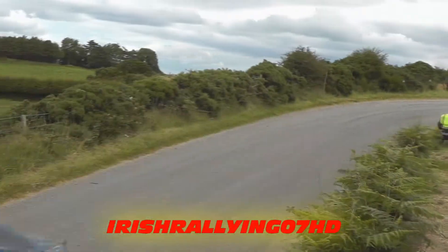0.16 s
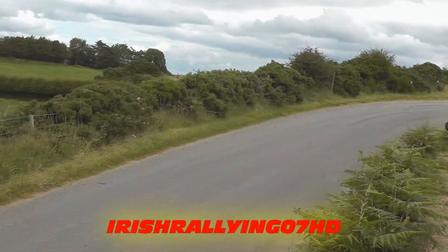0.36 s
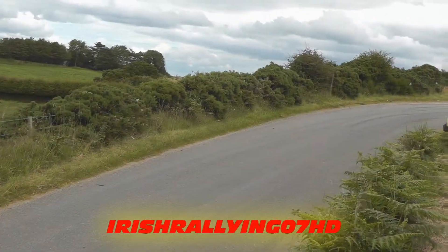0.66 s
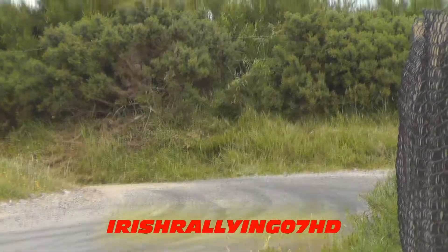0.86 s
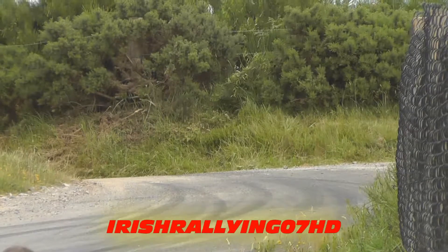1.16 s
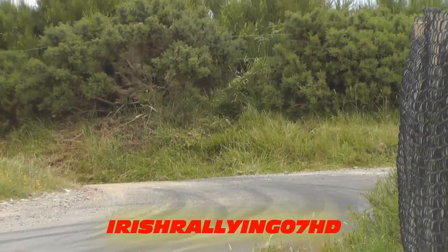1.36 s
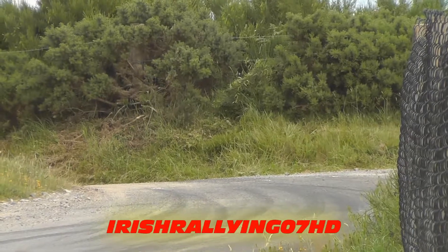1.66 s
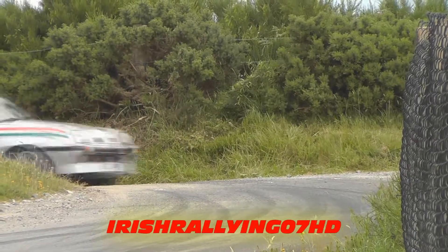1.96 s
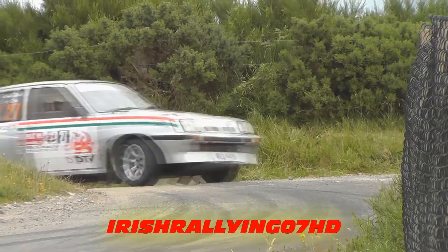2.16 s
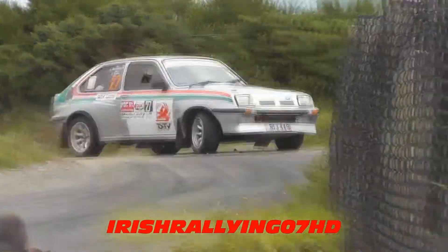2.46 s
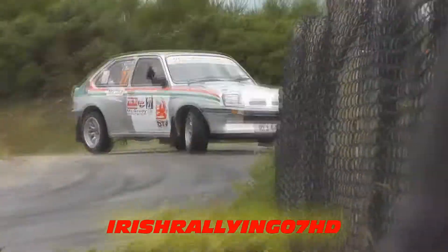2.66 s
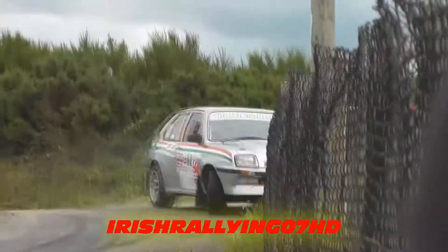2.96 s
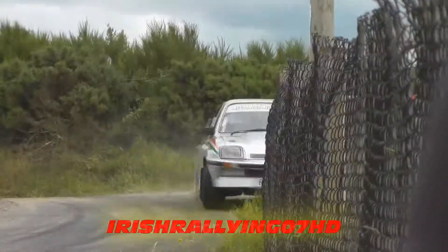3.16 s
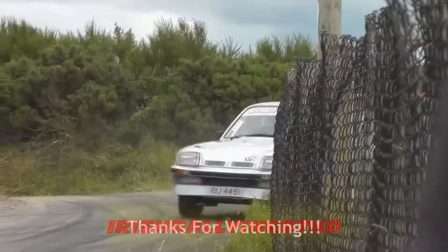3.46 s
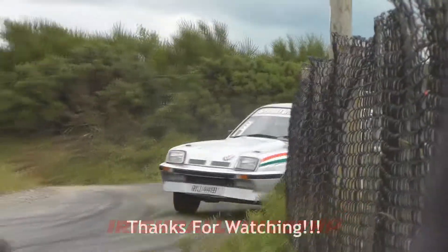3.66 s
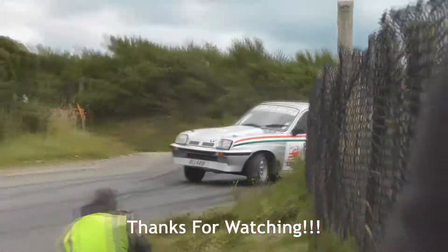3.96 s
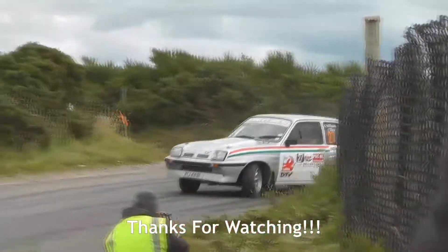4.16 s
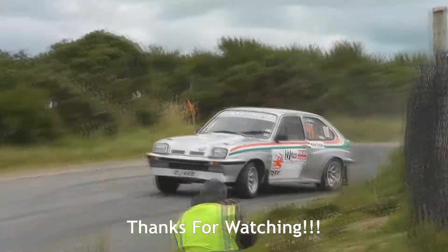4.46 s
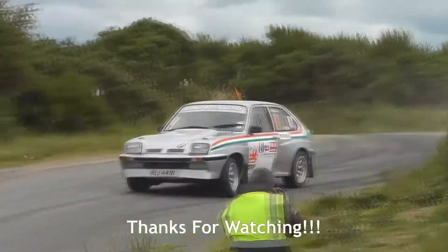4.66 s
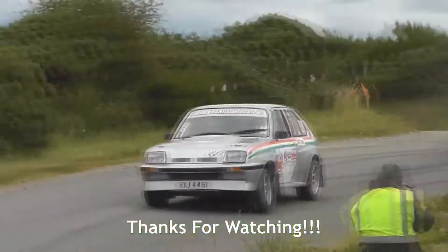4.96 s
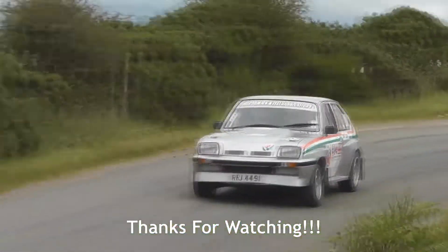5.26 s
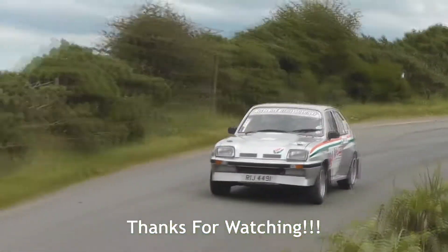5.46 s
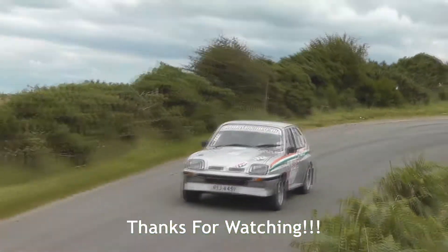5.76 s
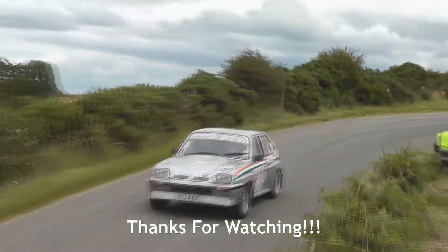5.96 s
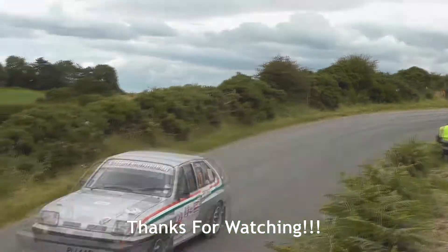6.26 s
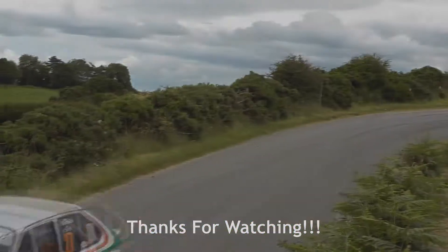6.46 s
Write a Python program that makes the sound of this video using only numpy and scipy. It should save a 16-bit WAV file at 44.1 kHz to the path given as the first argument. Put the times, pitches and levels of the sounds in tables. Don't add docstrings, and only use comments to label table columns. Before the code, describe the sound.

Full-throttle four-cylinder engine rasp stops dead; another car coasts in low and lumpy, blasts round a bend, climbs to high revs and changes up.

```python
import sys
import numpy as np
from scipy import signal
from scipy.fft import rfft, irfft, next_fast_len
from scipy.io import wavfile

SR = 44100
rng = np.random.default_rng(int(sys.argv[2]) if len(sys.argv) > 2 else 0)


def boost(x):
    u = np.asarray(x, float) / 20
    return 10 ** u


def store_pcm(level_fs):
    pcm = np.round(np.clip(level_fs, -1, 1) * 32767).astype(np.int16)
    wavfile.write(sys.argv[1], SR, np.atleast_2d(pcm).T)


N = 291677

# start_s, cycle_hz,
# levels of multiples 3, 4, 5, 8 and 12 of the cycle (line3_db, line4_db, line5_db, line8_db, line12_db),
# rasp_db (exhaust), hiss_db (tyres and intake), roughness (0-1), firing_lead_db (extra on every 4th multiple)
FIRST_CAR = [(0.0, 52.7, -27, -14, -39, -36, -25, -21.5, -29, 0.27, -1),
             (0.036, 52.94, -31, -12, -31, -29.5, -22, -19, -30, 0.1, -4),
             (0.178, 54.4, -35, -13.5, -40, -24.5, -23.5, -22, -28.5, 0.2, 2),
             (0.266, 55.15, -37, -22.5, -29, -21.5, -26, -19.5, -27.5, 0.03, 6),
             (0.326, 55.23, -50, -8, -28, -28.5, -21, -22.5, -27, 0.3, 6),
             (0.406, 56.4, -41, -13.5, -36.5, -26.5, -20, -21.5, -28.5, 0.24, 3),
             (0.498, 57.57, -40, -10.5, -32, -26.5, -34.5, -22, -26, 0.3, 5),
             (0.598, 55.36, -43, -10.5, -31, -25, -28, -21.5, -29.5, 0.2, 10),
             (0.726, 56.85, -43, -26, -30, -15.5, -49, -21.5, -33, 0.05, 11),
             (0.76, 56.3, -32, -12.5, -35, -17, -54, -30, -36, 0.3, 4),
             (0.775, 56.2, -44, -53, -45, -72, -61, -47.5, -86, 0.3, 13)]
BRAKING = [(0.78, 48.37, -33, -42, -46, -40, -54, -45, -59, 0.64, 2),
           (0.85, 49.67, -44, -34, -62, -58, -76, -47, -56.5, 0.71, 2),
           (0.98, 46.28, -47, -44, -60, -48, -44, -46.5, -60, 0.9, 2),
           (1.06, 44.8, -35.5, -39, -57, -63, -68, -47, -61, 0.75, 2),
           (1.19, 43.2, -36.5, -37.5, -44, -66, -49, -47.5, -61.5, 0.73, 2),
           (1.48, 35.88, -53, -25, -65, -61, -74, -44.5, -63.5, 0.83, 2.3),
           (1.74, 28.92, -60, -27.5, -45, -45, -69, -43, -66.5, 0.72, 2),
           (1.95, 27.98, -63.5, -31, -49, -41, -54, -47, -70.5, 0.9, 2),
           (2.35, 21.62, -63, -36.5, -54, -39, -38, -42.5, -52.5, 0.91, 2.14),
           (2.5, 24.15, -61.5, -37.5, -54.5, -48, -66, -41.5, -47.5, 0.97, 2),
           (2.62, 26.0, -62, -35.5, -55, -37, -50, -44, -50, 0.88, 2.3),
           (2.81, 23.06, -57, -43, -50.5, -60, -45, -44.5, -53, 0.9, 2)]
HAIRPIN = [(2.79, 26.24, -47, -38, -48, -47, -49, -37.5, -56, 0.99, 2.2),
           (2.888, 28.37, -33, -30.5, -37, -28.5, -54, -32.5, -51, 0.77, 2),
           (2.998, 29.97, -44, -25.5, -50, -37, -41, -31, -46.5, 0.66, 2),
           (3.084, 39.08, -36, -19.5, -33, -23.5, -28.5, -27.5, -48, 0.63, 2),
           (3.162, 48.4, -34, -44, -30, -46, -38, -25, -46.5, 0.76, 2),
           (3.188, 51, -34, -25, -30, -24, -24.5, -23.5, -42.5, 0.65, 2),
           (3.474, 55.31, -36, -24, -13, -25.5, -23, -20, -34.5, 0.75, 2),
           (3.56, 56.98, -27.5, -29, -14.5, -43, -34, -22.5, -37, 0.68, 2),
           (3.62, 56.7, -42, -29.5, -48, -36, -31, -29, -38, 0.65, 2.4),
           (3.792, 51.85, -46, -41, -54, -36.5, -58, -29, -44, 0.7, 2.8),
           (3.888, 49.18, -54, -16, -27, -18.5, -41, -21.5, -38, 0.81, 2.1),
           (3.974, 53.77, -32, -15, -14.5, -21.5, -17.5, -19.5, -30.5, 0.53, 2.05),
           (4.064, 56.7, -38, -33, -35.5, -34, -32.5, -26, -31, 0.93, 2.6),
           (4.128, 56.7, -28, -33, -12.5, -50, -23.5, -23.5, -27, 0.69, 2.34),
           (4.292, 54.16, -37.5, -17, -26.5, -38, -25.5, -26, -29, 0.62, 2),
           (4.392, 52.7, -49, -22, -51, -38.5, -56.5, -29, -26, 0.7, 2.25),
           (4.42, 52.7, -31, -23, -29, -42, -62, -17, -27, 0.67, 1.7)]
PULLING_AWAY = [
    (4.4, 50.8, -44, -26.5, -52, -64, -33, -32, -37, 0.15, 3.1),
    (4.448, 50.06, -30.5, -19.5, -23, -22.5, -30, -23, -27, 0.15, 2.7),
    (4.774, 45.56, -31.5, -13.5, -20, -38, -31.5, -18, -33.5, 0.2, 3.8),
    (4.914, 50.56, -33, -17, -25, -21.5, -29, -18, -30.5, 0.11, 2.7),
    (5.252, 56.8, -26.5, -25.5, -20, -25, -28.5, -19.5, -28, 0.1, 3.3),
    (5.478, 59.8, -26.5, -31, -21, -39.5, -23, -19.5, -28, 0.094, 5.6),
    (5.638, 62.83, -25, -39, -24, -28.5, -22, -18.5, -27, 0.11, 4.1),
    (5.796, 66.2, -27, -23, -31.5, -30.5, -45, -19, -24.5, 0.15, 4.7),
    (6.096, 72.27, -30.5, -17, -43, -21.5, -32.5, -17.5, -27, 0.15, 4),
    (6.13, 72.6, -33, -36, -47, -28, -33, -14, -25, 0.27, 3),
]
GEAR_CHANGE = [
    (6.11, 72.3, -28, -19, -39, -21, -26, -26, -25, 0.4, 1),
    (6.132, 72.5, -40, -29.5, -53, -27.5, -40, -18, -26.5, 0.36, 0.78),
    (6.244, 73.53, -47, -36, -55, -21, -28, -17.5, -26.5, 0.55, 1),
    (6.294, 71.8, -19, -23, -30, -22.5, -31, -17, -26.5, 0.79, 1),
    (6.312, 69.5, -29, -28, -36, -21.5, -20.5, -17.5, -26, 0.5, 1),
    (6.396, 61.53, -27, -40, -23, -35, -21, -18, -27, 0.32, 1),
    (6.46, 57.4, -34, -27, -27, -34.5, -27.5, -17, -27.5, 0.34, 1),
    (6.614, 60.2, -38, -30, -27.5, -27, -18, -19.5, -28.5, 0.4, 1),
]
OWN_MULTIPLES = (3, 4, 5, 8, 12)
# pitch_hz, level_db
FIRST_PIPE = [(60, -33.5), (160, -17.5), (220, -9), (330, -21), (450, -17.5), (700, -9), (850, -18),
              (1150, -17), (1500, -19.5), (1650, -26.5), (2200, -20), (4000, -53), (6000, -75)]
BRAKING_PIPE = [(24, -55), (40, -26), (120, -5), (214, -4.5), (360, -15), (693, -10), (1120, -23.5),
                (1560, -22.5), (1780, -30.5), (2080, -26), (2380, -33), (2770, -34.5), (4000, -47),
                (5200, -76), (8800, -120)]
HAIRPIN_PIPE = [(50, -28), (110, -19), (205, -11.5), (290, -6.5), (367, -20), (430, -15), (655, -10.5),
                (800, -11), (950, -20.5), (1200, -19.5), (1600, -24.5), (2160, -28), (4000, -36),
                (6000, -63)]
AWAY_PIPE = [(70, -28), (300, -0.5), (420, -9.5), (580, -6), (790, 2.5), (960, -14), (1150, -4.5),
             (1300, -6.5), (1450, -10), (1630, -10), (2100, -9), (2700, -18.5), (4000, -50), (6000, -66)]
GEAR_CHANGE_PIPE = [(70, -41), (140, -13.5), (300, -12), (420, -16.5), (580, -6.5), (750, 1), (960, -10),
                    (1150, -7), (1300, -3.5), (1500, -10), (2100, -13), (2700, -19.5), (4000, -46),
                    (6000, -63)]
# pitch_hz, level_db
FIRST_HISS = [(1470, -25), (2500, -4), (5200, -12.5), (6590, -2), (7340, -9), (10600, -22.5),
              (15500, -27.5)]
BRAKING_HISS = [(1470, -22), (2500, 0), (3070, -4), (4820, -9.5), (5830, -5.5), (9660, -23.5), (15500, -26)]
HAIRPIN_HISS = [(1470, -16.5), (2500, -0.5), (4530, -6), (6590, -4.5), (7390, -12.5), (14400, -32.5),
                (15500, -46)]
AWAY_HISS = [(1470, -17), (2500, 1.5), (3070, -2.5), (3420, -2), (4430, -7.5), (6640, -5.5), (15500, -30)]
# start_s, pitch_hz, level_db
FIRST_WHINE = [
    (0.0, 6327, -28.5),
    (0.228, 6640, -25.5),
    (0.244, 6380, -26),
    (0.382, 6840, -31),
    (0.662, 6620, -44),
    (0.736, 6300, -52),
    (0.77, 6940, -68),
]
SECOND_WHINE = [
    (4.15, 6900, -51),
    (4.27, 6570, -33),
    (4.4, 6100, -39),
    (4.52, 5900, -32),
    (4.62, 5750, -51),
]
BRAKE_SQUEAL = [
    (2.42, 5650, -70),
    (2.45, 5730, -55),
    (2.52, 5970, -51),
    (2.57, 6000, -67),
]
PIPE_BOOMS = [
    [(2.8, 300, -44), (2.88, 306.4, -28), (3.0, 300, -29), (3.1, 300, -18), (3.18, 300, -28)],
    [(2.82, 206.7, -45), (2.9, 223.4, -30), (3.0, 219.6, -34), (3.08, 223, -42)],
]
# start_s, peak_db, centre_hz, t60_s (time to die by 60 dB)
KNOCKS = [(1.754, -26, 150.6, 0.045), (2.15, -48, 5500, 0.28), (2.222, -35.5, 3000, .12),
          (2.385, -23.5, 2200, .25), (2.505, -39, 3500, .08), (2.631, -42, 6000, 0.46),
          (2.92, -36, 4500, .2), (2.95, -27, 70, .3), (3.106, -17, 400, .1), (3.9, -22, 2500, 0.3),
          (5.992, -24, 80, .02), (6.14, -22, 130, .1), (6.261, -22, 111, .1)]
# pitch_hz,
# side_in_step (share of mid), side_quarter_turn (share of mid), scatter_db (echoes)
FROM_LEFT = [(100, .05, -.05, -11.5), (220, -0.1, 0.059, -13.5), (450, .25, .3, -14), (650, 0.15, 0, -9.5),
             (1050, 0.5, .28, -11), (3000, 0.51, 0, -9.5), (6200, 0.071, -.05, -21), (8500, .4, -.1, -7.5),
             (12000, .1, -.35, 0.5), (15500, -.4, -.2, -4)]
FROM_AHEAD = [(100, -0.11, -.13, -13.5), (300, -0.16, 0, -17.5), (430, -.02, .1, -10.5),
              (600, -0.1, -.03, -17), (1000, .1, .18, -8), (1800, .12, .05, -13), (2500, -.07, -.08, -11.5),
              (3800, 0.023, 0, -17), (5500, 0, 0, -17), (7200, -.2, 0, -13.5), (8000, 0, .2, -12),
              (11000, .1, 0, -13.5), (15500, 0, 0, -10)]
# pitch_hz, width_hz, level_db
HOUSING_DIPS = [(1815, 43.4, -26.5), (2419, 50, -25.5), (3070, 75, -13)]


def rms_one(x):
    return x / np.sqrt(np.mean(x ** 2) + 1e-20)


def at_hz(points, hz):
    table_hz, table_db = np.array(points)[:, 0], np.array(points)[:, 1]
    return np.interp(np.log(hz + 1e-9), np.log(table_hz), table_db)


def drift(rate_hz, size, step):
    r = np.exp(-2 * np.pi * rate_hz * step / SR)
    smooth = signal.lfilter([1], [1, -2 * r, r * r], rng.standard_normal(size + 500))
    return rms_one(smooth[500:])


def coloured(x, spectrum, low_hz, high_hz):
    hz = np.fft.rfftfreq(len(x), 1 / SR)
    shaped = rfft(x) * boost(at_hz(spectrum, hz))
    in_band = irfft(shaped * ((hz > low_hz) & (hz < high_hz)), len(x))
    return irfft(shaped, len(x)) / np.sqrt(np.mean(in_band ** 2))


def engine(rows, pipe, hiss, fade_s, rasp_trim_db, gate):
    s, *columns = np.transpose(rows)
    start, end = int(max(s[0], 0) * SR), min(int(s[-1] * SR), N)
    t = np.arange(start, end) / SR
    cycle_hz, *lines_db, rasp_db, hiss_db, rough, lead_db = [np.interp(t, s, c) for c in columns]
    rough = np.clip(rough, 0, 1)

    def flutter(rate_hz):
        return drift(rate_hz, len(t), 0.71)

    unsteady = 1 + .012 * rough * flutter(20.)
    turn = 2 * np.pi * np.cumsum(cycle_hz * unsteady) / SR
    lines = 0
    for k, db in zip(OWN_MULTIPLES, lines_db):
        level = boost(db + 2.7 * rough * flutter(20.0))
        lines = lines + np.sqrt(2) * level * np.sin(k * turn + 0.37 * k)

    firing = 1 + gate * np.cos(4 * turn) + 0.38 * gate * np.cos(turn)
    puffs = rng.standard_normal(len(t)) * firing * boost(1.43 * flutter(21.0))
    noise = coloured(puffs, pipe, 420, 1400)
    tones = upper_multiples(cycle_hz, turn, pipe, lead_db)
    rasp = np.sqrt(1 - rough) * tones + np.sqrt(rough) * noise
    rush = rng.standard_normal(len(t)) * firing * boost(0.98 * flutter(7.2))
    air = coloured(rush, hiss, 3420, 10000)

    sound = lines + boost(rasp_db + rasp_trim_db) * rasp + boost(hiss_db - .5) * air
    fade = np.minimum((t - s[0]) / fade_s[0], (s[-1] - t) / fade_s[1])
    out = np.zeros(N)
    out[start:end] = sound * np.sqrt(np.clip(fade, 0, 1))
    return out


def upper_multiples(cycle_hz, turn, pipe, lead_db):
    step = 64
    coarse_hz = cycle_hz[::step]
    orders = [k for k in range(2, 56) if k not in OWN_MULTIPLES]
    gains = []
    for k in orders:
        lead = lead_db[::step] * (k % 4 == 0)
        wander = 5 * drift(2.83, len(coarse_hz), step)
        gains.append(boost(at_hz(pipe, k * coarse_hz) + lead + wander))
    gains = np.array(gains)

    hz = np.outer(orders, coarse_hz)
    in_band = (hz > 500) & (hz < 1800)
    gains = gains / np.sqrt(.5 * np.sum(gains ** 2 * in_band, axis=0))
    at = np.arange(len(turn)) / step
    total = 0
    for k, gain in zip(orders, gains):
        level = np.interp(at, np.arange(len(coarse_hz)), gain)
        total = total + level * np.sin(k * turn + rng.uniform(0, 3.2))
    return total


def wavering_tone(rows, waver_hz, rate_hz, throb_db):
    s, hz, level_db = np.transpose(rows)
    t = np.arange(N) / SR
    pitch_hz = np.interp(t, s, hz) + waver_hz * drift(rate_hz, N, 1)
    turn = 2 * np.pi * np.cumsum(pitch_hz) / SR
    level_db = np.interp(t, s, level_db, left=-120, right=-120)
    level_db = level_db + throb_db * drift(rate_hz / 2, N, 1)
    return np.sqrt(2) * boost(level_db) * np.sin(turn)


def knocks():
    out, t = np.zeros(N), np.arange(SR // 5) / SR
    for s, peak_db, hz, t60 in KNOCKS:
        band = signal.butter(2, [hz / 1.8, hz * 1.8], "band", fs=SR, output="sos")
        push = 3 * (t < .5 / hz)
        burst = (rng.standard_normal(len(t)) + push) * boost(-60 * t / t60)
        burst = signal.sosfilt(band, burst)
        start = int(s * SR)
        out[start:start + len(t)] += boost(peak_db) * burst / np.abs(burst).max()
    return out


def left_and_right(x, table):
    size = next_fast_len(N + 8192)
    hz = np.fft.rfftfreq(size, 1 / SR)
    at, *columns = np.transpose(table)
    in_step, quarter, scatter_db = [np.interp(np.log(hz + 1), np.log(at), c) for c in columns]
    length = SR // 12
    echoes = rng.standard_normal(length) * boost(-25 * np.linspace(0, 1, length))
    scatter = boost(scatter_db) * rfft(echoes / np.sqrt(np.sum(echoes ** 2)), size)
    side = irfft(rfft(x, size) * (in_step + 1j * quarter + scatter), size)[:N]
    return np.array([x + side, x - side])


def wind():
    low = signal.butter(2, [30, 70], "band", fs=SR, output="sos")
    gust_db = -53 + 2.0 * drift(3., N, 0.86)
    return boost(gust_db) * rms_one(signal.sosfilt(low, rng.standard_normal((2, N))))


def scene():
    first = engine(FIRST_CAR, FIRST_PIPE, FIRST_HISS, (1e-4, .008), rasp_trim_db=0, gate=0.35)
    first = first + wavering_tone(FIRST_WHINE, waver_hz=50, rate_hz=95.0, throb_db=3.5)

    braking = engine(BRAKING, BRAKING_PIPE, BRAKING_HISS, (.008, .02), rasp_trim_db=3.5, gate=0.11)
    hairpin = engine(HAIRPIN, HAIRPIN_PIPE, HAIRPIN_HISS, (.02, .02), rasp_trim_db=-2, gate=0.069)
    away = engine(PULLING_AWAY, AWAY_PIPE, AWAY_HISS, (.02, .02), rasp_trim_db=-2, gate=0.094)
    shift = engine(GEAR_CHANGE, GEAR_CHANGE_PIPE, AWAY_HISS, (.02, 1e-4), rasp_trim_db=-1.5, gate=0.16)
    squeal = wavering_tone(BRAKE_SQUEAL, waver_hz=70, rate_hz=80., throb_db=3.5)
    whine = wavering_tone(SECOND_WHINE, waver_hz=44.6, rate_hz=110.0, throb_db=-0.5)
    booms = sum(wavering_tone(rows, waver_hz=9.2, rate_hz=24.7, throb_db=2.0) for rows in PIPE_BOOMS)
    second = braking + hairpin + away + shift + knocks() + squeal + whine + booms

    before_change = np.arange(N) < FIRST_CAR[-1][0] * SR
    cars = left_and_right(first, FROM_LEFT) * before_change + left_and_right(second, FROM_AHEAD)
    return cars + wind()


def band_limit(x):
    return signal.sosfilt(signal.butter(12, 15650, fs=SR, output="sos"), x)


def record(dry):
    size = next_fast_len(N + 4096)
    hz = np.fft.rfftfreq(size, 1 / SR)
    dips_db = sum(db / (1 + (2 * (hz - f) / width) ** 2) for f, width, db in HOUSING_DIPS)
    bass_cut = 1 / (1 + (45 / (hz + 1)) ** 3)
    heard = irfft(rfft(dry, size) * boost(dips_db) * bass_cut, size)[:, :N]
    heard = heard + boost(-66.5) * rng.standard_normal(dry.shape)
    mix = 1.26 * np.tanh(heard / 1.24)
    return band_limit(mix)


dry = scene()
out = record(dry)
store_pcm(out)
```